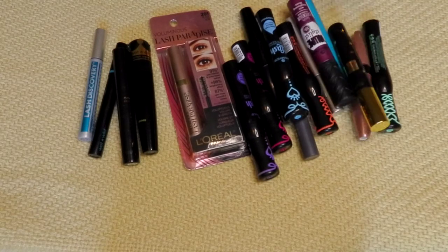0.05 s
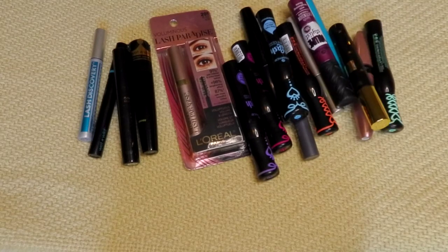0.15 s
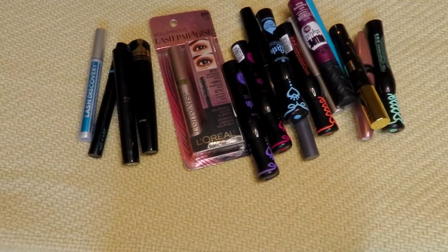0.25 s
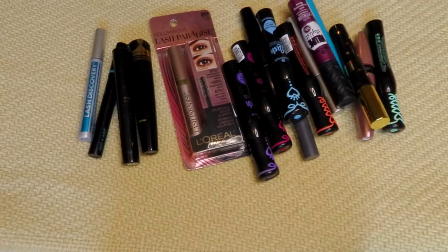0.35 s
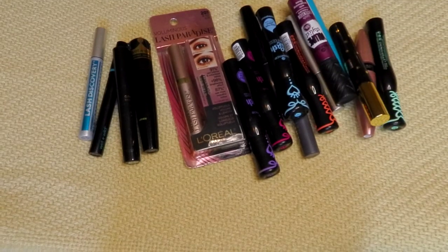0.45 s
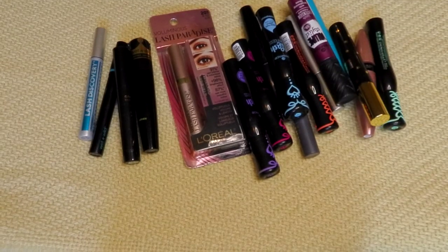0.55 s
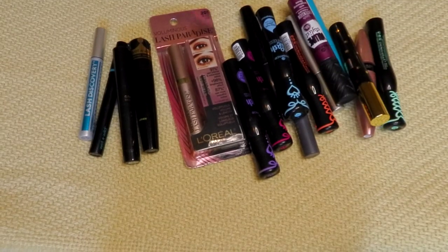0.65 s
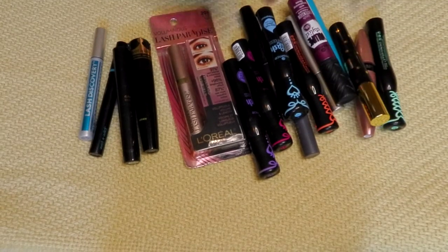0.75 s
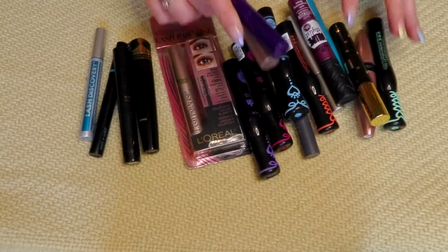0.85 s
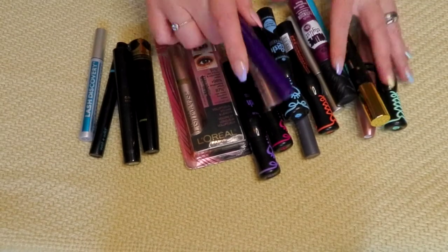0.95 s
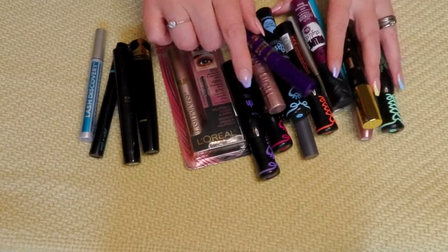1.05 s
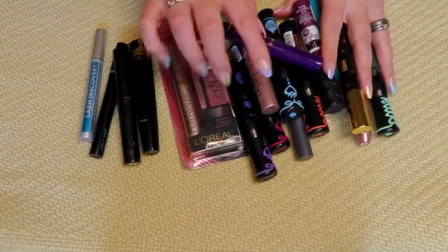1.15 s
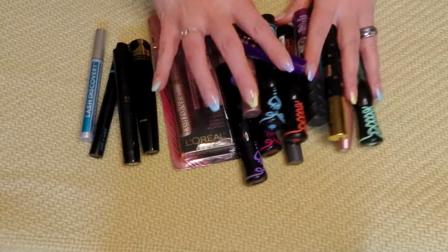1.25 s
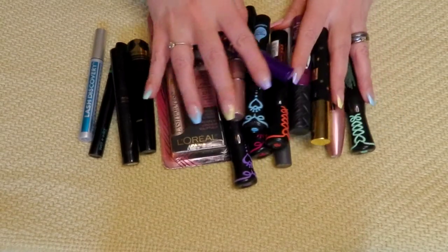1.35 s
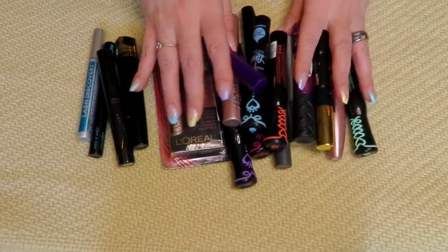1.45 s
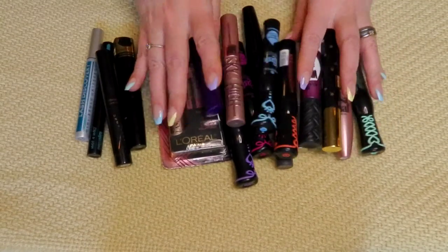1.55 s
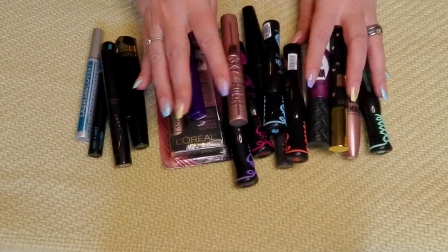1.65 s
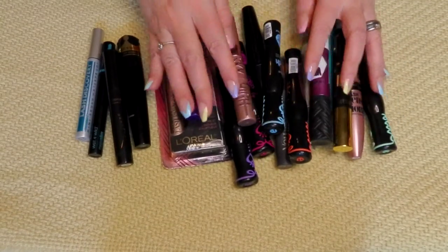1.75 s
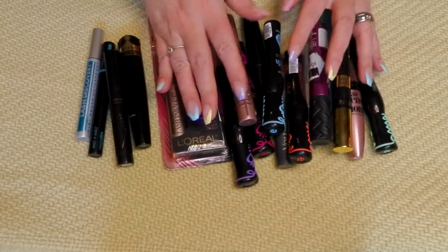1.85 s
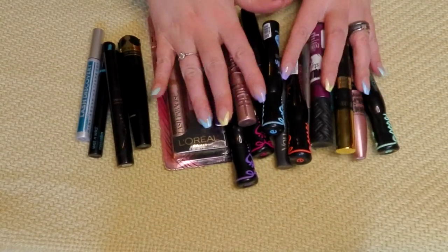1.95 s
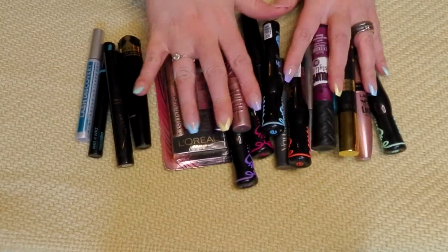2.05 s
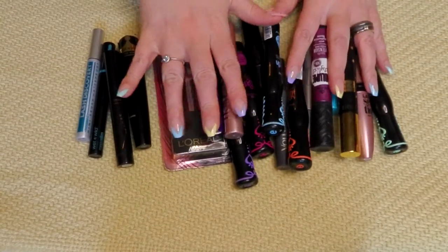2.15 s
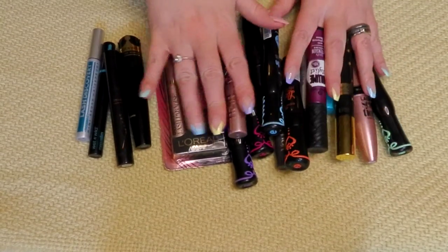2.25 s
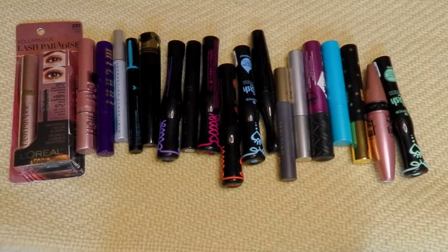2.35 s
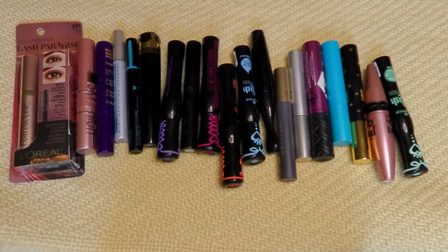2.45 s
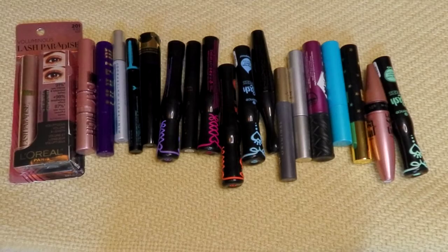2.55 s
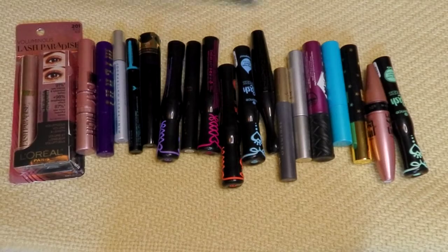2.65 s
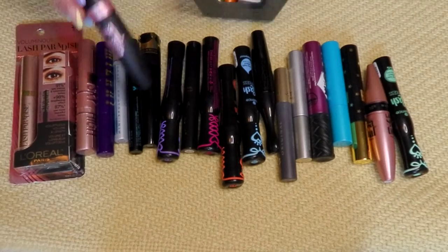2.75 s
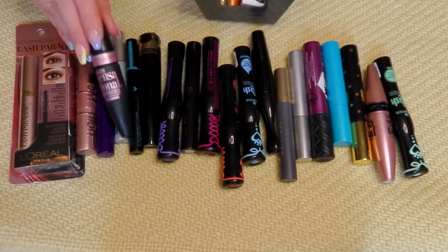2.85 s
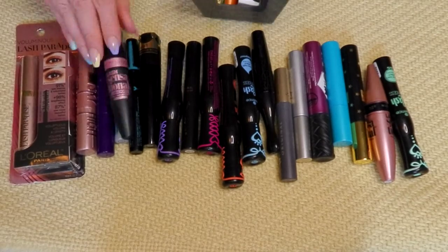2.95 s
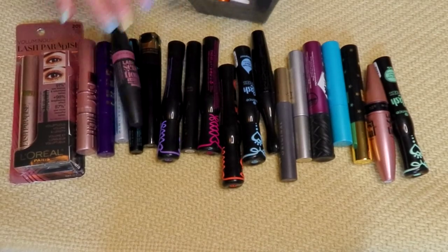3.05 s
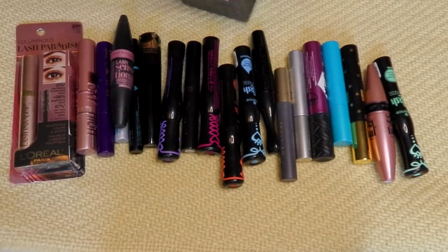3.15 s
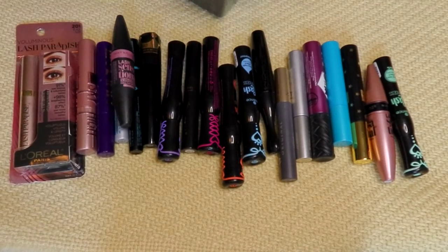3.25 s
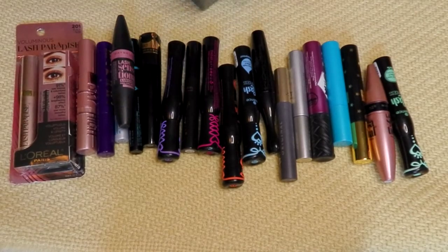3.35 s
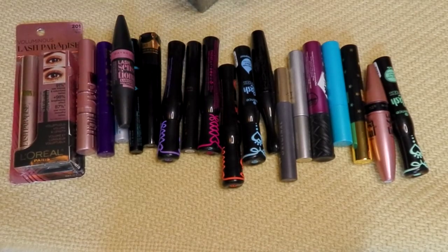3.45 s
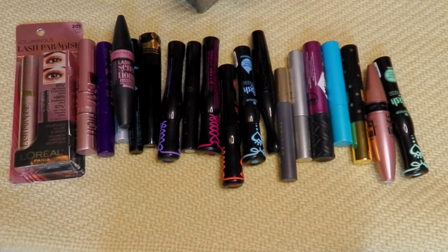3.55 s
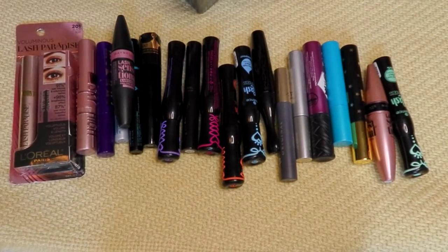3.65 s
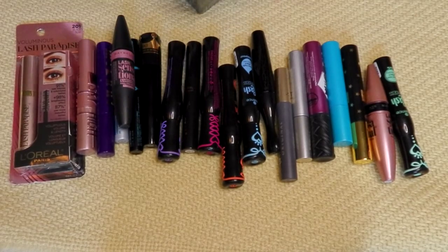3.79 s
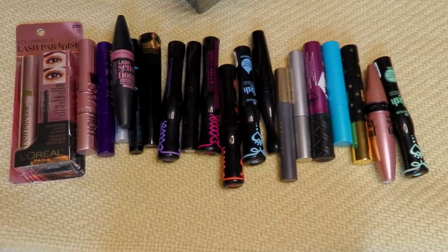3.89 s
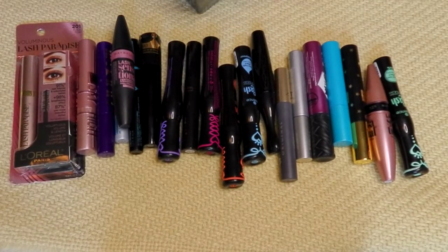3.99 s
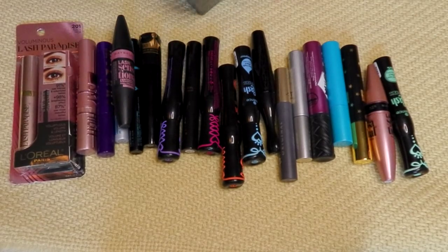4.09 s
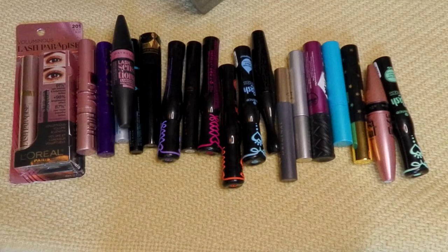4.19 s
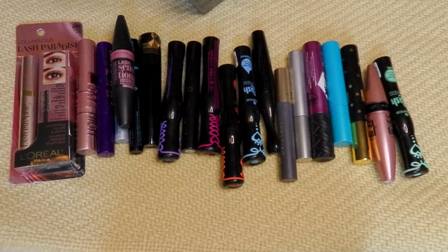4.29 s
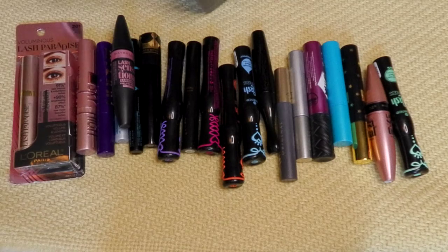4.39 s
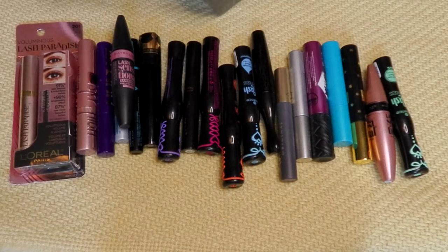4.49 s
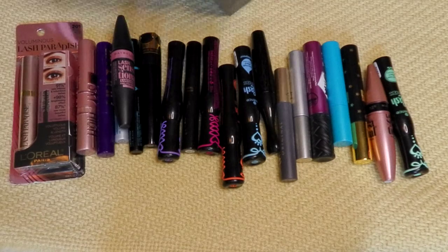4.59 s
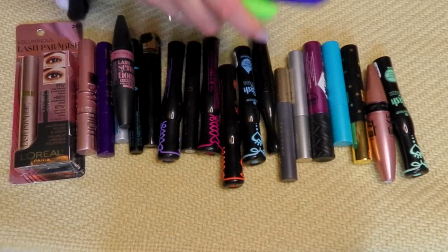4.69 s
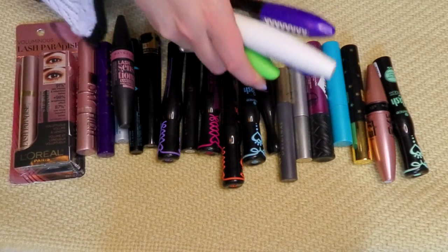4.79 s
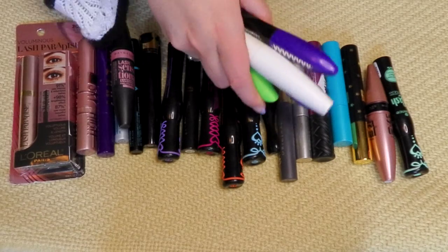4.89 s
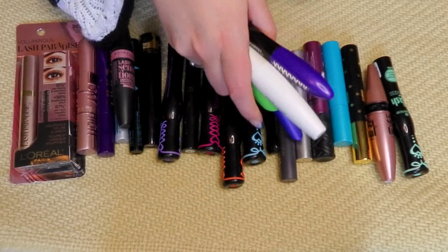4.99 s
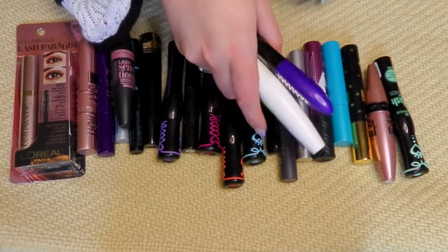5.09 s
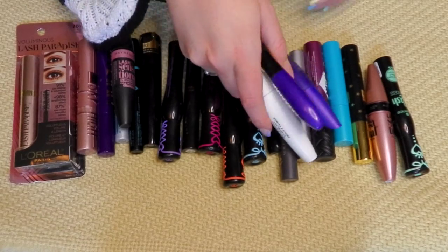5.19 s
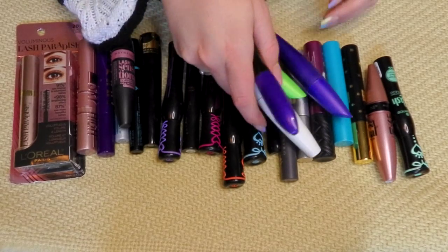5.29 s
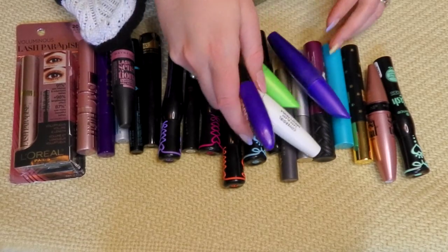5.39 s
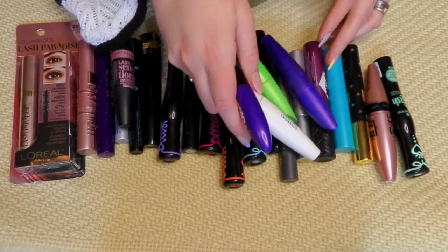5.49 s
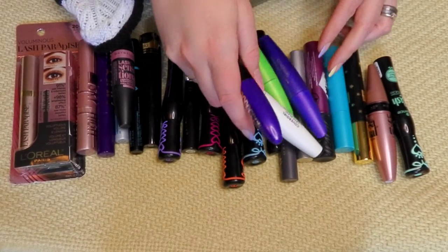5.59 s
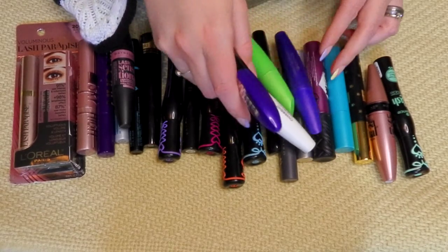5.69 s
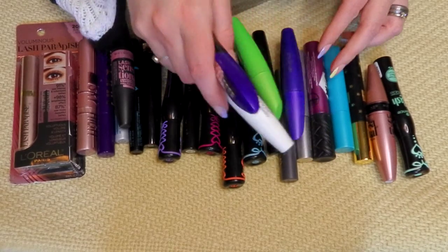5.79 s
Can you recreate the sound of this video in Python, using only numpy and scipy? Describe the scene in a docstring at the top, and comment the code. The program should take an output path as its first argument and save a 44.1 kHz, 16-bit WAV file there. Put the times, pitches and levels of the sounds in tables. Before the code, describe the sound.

Two isolated ticks, near quiet, then dense dry clatter of small hard plastic tubes on padded cloth, faint scuffing between. Next a short box rattle with a scrape, a few hollow clacks, then a longer, louder box rummage with a struck metal sleeve and high pings. Finally a handful of bright tube clicks with soft swishes. Close-miked, short echoes, steady low room noise.

```python
"""Make-up tubes on a cloth

Plastic make-up tubes are pushed into a row on a woven cloth, close by in a small, soft room.
They click together (a sharp burst plus fading tones) and thud on the cloth (low swings plus noise).
Twice a hand rummages in a box: blunter knocks make it ring, and a metal sleeve is struck.
A few short, high pings stand out, each one clear tone. Shaped noise makes the sliding and brushing;
short echoes and a steady rumble and hiss make the room.
"""
import sys
import numpy as np
from scipy import signal
from scipy.fft import rfft, irfft, next_fast_len
from scipy.io import wavfile
from scipy.ndimage import uniform_filter1d

SR = 44100
rng = np.random.default_rng(int(sys.argv[2]) if len(sys.argv) > 2 else 0)


def dump(signal):
    """Clip the signal to [-1, 1] and save it as 16-bit WAV at the path in sys.argv[1]."""
    limited = np.clip(np.atleast_2d(signal).T, -1, 1)
    pcm = np.round(limited * 32767).astype(np.int16)
    wavfile.write(sys.argv[1], SR, pcm)


N = 257103  # length in samples

# tube against tube: start_s, ring_hz, level_db, hardness_db (extra treble of the contact)
CLICKS = [(0.0375, 11940, -29, -9.5), (0.0511, 3020, -45, 1.5), (0.1103, 1550, -35, 4),
          (0.1151, 2360, -37.5, 8.5), (0.119, 517, -42.5, 0), (0.5233, 1360, -55.5, 6.5),
          (0.633, 3000, -63, 1), (1.046, 1960, -50, 1), (1.0538, 4860, -38, 5), (1.0543, 3100, -31.5, 6.5),
          (1.0637, 4700, -53, 1), (1.0747, 5220, -33, 5.5), (1.0964, 3060, -42, 13.5),
          (1.1012, 1760, -36.5, 0), (1.1085, 700, -36, 13), (1.12, 1200, -46, -2), (1.131, 900, -51, 7),
          (1.144, 1520, -47.5, 16), (1.153, 1310, -52, 10), (1.2485, 3500, -38, -3.5),
          (1.261, 1790, -39, 5.5), (1.285, 4960, -44.5, -5.5), (1.3597, 1480, -40, 12),
          (1.364, 6000, -32.5, -5.5), (1.3722, 3180, -36.5, -1.5), (1.381, 2550, -43.5, -4),
          (1.4714, 6240, -34, -10.5), (1.4785, 5900, -31, -11.5), (1.529, 2180, -48, -3),
          (1.5405, 1100, -30.5, 4), (1.5962, 2100, -45.5, 11.5), (1.656, 3030, -61, -3),
          (1.664, 1490, -31, 10), (1.674, 1500, -45, 5), (1.698, 1770, -46, 1), (1.708, 1800, -42.5, -1.5),
          (1.768, 2460, -49.5, 3), (1.804, 2700, -48.5, -0.5), (1.8428, 2100, -39.5, -5),
          (1.8523, 2560, -39, -4), (1.8577, 11100, -26.5, -15), (2.0213, 15000, -27, -16),
          (2.0378, 1800, -35.5, 4.5), (2.1548, 4900, -44, -8.5), (2.282, 3290, -45.5, 1.5),
          (2.373, 960, -50, 12), (2.3923, 7700, -31, -9), (2.4083, 1570, -44, -9),
          (2.8358, 1450, -51.5, 10.5), (2.9358, 1610, -28.5, 6), (2.94, 496, -28.5, 14.5),
          (2.963, 2170, -54, -2), (3.0921, 1590, -47.5, 18.5), (3.0939, 1630, -33, -16),
          (3.1294, 2180, -57, 2), (3.1356, 2020, -39, -2), (3.1505, 2070, -36, 7.5),
          (3.2093, 1330, -46.5, -11), (3.2395, 2230, -42, -2.5), (3.5694, 12100, -52.5, 1.5),
          (4.981, 2760, -41.5, -2.5), (5.0702, 3750, -34, 4.5), (5.0806, 3150, -44.5, 7),
          (5.1086, 2720, -43.5, 11), (5.116, 2650, -45.5, 3), (5.2153, 2860, -42, 0),
          (5.221, 2630, -43.5, 1), (5.2275, 617, -40, -4.5), (5.258, 1700, -52.5, -5),
          (5.3085, 2510, -31.5, 9.5), (5.3117, 4800, -35, -2.5), (5.4711, 1850, -43.5, 6),
          (5.6165, 3300, -36, 6.5), (5.6215, 3500, -46, -5), (5.6269, 3540, -46, 3), (5.628, 3760, -44, -6),
          (5.6389, 3320, -41, -11), (5.6478, 12500, -23, -17), (5.6722, 1550, -46.5, 9),
          (5.676, 2540, -42, -2), (5.679, 3060, -37.5, -5), (5.6875, 3670, -43, -9),
          (5.696, 3300, -42, -10), (5.709, 2800, -48, -3), (5.716, 3050, -48.5, -4),
          (5.7759, 1820, -43.5, 3), (5.782, 1850, -48, 4), (5.805, 3270, -56, -1)]
# tubes knocking in the box: start_s, ring_hz, level_db, hardness_db (extra treble of the contact)
KNOCKS = [(2.5758, 3500, -38.5, -4), (2.586, 3420, -50, -9), (2.6094, 630, -35, 3.5),
          (2.6105, 4650, -38.5, -8), (2.6334, 1500, -42, 2), (2.643, 2370, -41, 0), (2.657, 2600, -40, 3),
          (2.676, 870, -28, 4), (2.6805, 1440, -35, -4.5), (2.7326, 690, -46.5, -1),
          (2.7432, 1000, -30, 4.5), (2.7479, 1500, -39, 2), (2.768, 537, -51, -11.5),
          (3.3351, 1310, -45.5, 6), (3.3588, 1165, -44.5, 5), (3.363, 1350, -48, -13),
          (3.3975, 2210, -55, 3), (3.625, 1420, -54, 10.5), (3.6404, 1250, -40.5, 1),
          (3.6612, 13000, -28, -8.5), (3.727, 1220, -36, 1.5), (3.7355, 1740, -29, 0),
          (3.7413, 1840, -28, -3.5), (3.749, 1450, -31.5, 7), (3.752, 1720, -31, -11.5),
          (3.7587, 1370, -23.5, -2.5), (3.7635, 1340, -29, 2), (3.7829, 534, -36.5, 6),
          (3.7926, 875, -37, 7), (3.7995, 860, -48, -2), (3.8118, 970, -40, 2), (3.826, 1130, -43, 4.5),
          (3.8349, 1064, -33, 0.5), (3.839, 2820, -41, -1.5), (3.8441, 980, -47, -2),
          (4.0098, 1090, -38, 2.5), (4.0429, 800, -38, -2.5), (4.0597, 3330, -36.5, -4),
          (4.1062, 1200, -46.5, 2), (4.116, 3240, -39.5, -6.5), (4.149, 1200, -39.5, -4),
          (4.16, 2450, -38, -0.5), (4.1733, 1480, -35, 3), (4.176, 5390, -18, -4), (4.1766, 987, -22.5, 3),
          (4.184, 3500, -33.5, 12), (4.2229, 905, -20, 3.5), (4.2669, 1690, -21, -2),
          (4.2782, 2770, -32.5, 3), (4.393, 1530, -45.5, -1.5), (4.4385, 1490, -43.5, -1),
          (4.449, 2150, -43, -13.5), (4.452, 2550, -44.5, 3.5), (4.4652, 780, -36.5, 1),
          (4.494, 2850, -41, -5), (4.5425, 2480, -42, -3.5), (4.5616, 1330, -30.5, -1.5)]
# ways a tube rings: pitch_ratio (times its ring pitch), level_db, t60_s (time to fade by 60 dB)
TUBE_MODES = [(0.47, -19.5, 0.035), (1, 2, 0.011), (1.42, -27.5, 0.021), (2.15, -32, 0.0036)]
# edges of the four bands that set the tone of a blow: edge_hz
BAND_EDGES = [330, 900, 2400, 6400, 16000]
# a tube lands on the padded table: start_s, pitch_hz, level_db
THUDS = [(0.039, 122, -45.5), (0.111, 237, -37.5), (1.056, 150, -45), (1.076, 150, -42.5),
         (1.101, 159, -29.5), (1.137, 154, -38.5), (1.262, 150, -44), (1.348, 145, -41.5), (1.54, 262, -29),
         (1.663, 314, -28.5), (2.037, 113, -37), (2.371, 169, -45), (2.745, 265, -63), (2.935, 149, -36),
         (3.091, 127, -36.5), (3.333, 281, -42), (3.748, 164, -33.5), (3.783, 264, -28.5), (4, 176, -42),
         (4.179, 143, -32.5), (4.222, 263, -34), (5.073, 135, -29.5), (5.223, 298, -38), (5.31, 286, -42),
         (5.723, 187, -43), (5.781, 294, -37.5)]
# a hollow tube lands on its neighbours and rocks: start_s, level_db
HOLLOW_TAPS = [(2.963, -28), (3.0925, -29), (3.1294, -31), (3.1362, -27.5), (3.2101, -42), (3.2415, -39)]
# ways the hollow tube rings: pitch_hz, level_db, t60_s
HOLLOW_MODES = [(1160, -14, 0.041), (1840, -11, 0.02), (2113, 1.5, 0.016)]
# resonances of the box: pitch_hz, width_hz, level_db
BOX_RESONANCES = [(285, 22, 0), (519, 20, -7.5), (655, 49, 1.5), (809, 10, -6), (972, 34, 6),
                  (1527, 130, -12.5), (2290, 48, -5), (2930, 80, 2), (3430, 180, 2)]
# loose tubes jostle in the box: start_s, end_s, level_db
JOSTLES = [(2.56, 2.72, -45.5), (3.33, 3.52, -56), (3.7, 3.87, -43.5), (3.98, 4.2, -53), (4.3, 4.53, -48)]
# a tube scrapes out from between the others: start_s, end_s, level_db
RASPS = [(2.648, 2.684, -35.5)]
# resonances of that scrape: pitch_hz, width_hz, level_db
RASP_RESONANCES = [(2560, 350, -4), (3460, 300, 2), (4500, 170, 6), (9200, 1200, -24)]
# short, high pings, such as a metal cap, a plastic tube or a fingernail tick:
# start_s, pitch_hz, level_db, t60_s
PINGS = [(2.0202, 14000, -19, .005), (4.2068, 2920, -23, .05), (4.5725, 2860, -25, .047),
         (5.0705, 10000, -28, .025)]
# a metal sleeve is struck in the box: start_s, level_db
SLEEVE_HITS = [(4.0598, -33), (4.1845, -31)]
# ways the sleeve rings: pitch_hz, level_db, t60_s
SLEEVE_MODES = [(2500, -5.5, 0.1), (4430, -3, 0.059), (5240, 2.5, 0.036), (7200, -9, 0.056)]
# a tube rubs along another and sings faintly: start_s, end_s, level_db
SQUEAKS = [(2.47, 2.535, -57)]
# sliding and jostling under the hands, a level curve: time_s, level_db
SLIDING = [(0, -55), (.2, -83), (.6, -63.5), (1.03, -84.5), (1.12, -47), (1.2, -56.5), (1.6, -51.5),
           (1.93, -58), (2.24, -58), (2.45, -53), (3.2, -64), (3.56, -55), (4.5, -59), (4.7, -64),
           (5.55, -58), (5.83, -57)]
# tone colour of the sliding: frequency_hz, level_db
SLIDE_COLOUR = [(59, -44), (100, -0.5), (676, -6.5), (1830, -11.5), (2170, -12), (5900, -17), (12100, -20),
                (16000, -16)]
# a hand or a tube brushes past: start_s, end_s, level_db
SWISHES = [(.69, .8, -67), (1.96, 2.03, -57.5), (3.01, 3.08, -68), (5.0, 5.06, -56.5), (5.18, 5.31, -48.5)]
# tone colour of the room rumble and hiss: frequency_hz, level_db
FLOOR_COLOUR = [(12, -50), (20, -25), (43, 0.5), (123, -8), (150, -10), (328, -6), (459, -9.5), (825, -18),
                (1030, -20.5), (16000, -28.5)]
# where the hands work: time_s, left_minus_right_db
PLACE = [(0, -0.5), (1.1, -0.5), (1.6, 1.5), (2.1, 0), (2.65, -0.5), (2.94, 3.5), (3.15, 3.5), (3.7, 0.9),
         (4.6, 1), (5.1, 0)]
# the left microphone port hears more bass: frequency_hz, left_minus_right_db
BASS_LEAN = [(100, -0.5), (250, 2.1), (600, 0.1), (4000, 0)]
# tone colour of the microphone: frequency_hz, level_db
MICROPHONE = [(5500, 0.5), (8000, -3.5), (10300, -1.5), (13000, -2), (16000, -8.5)]

CUT_HZ = 16200  # upper limit of the sound


def clicks():
    """Tubes meet on the cloth in short, dry clicks; plastic damps its high rings more."""
    out = np.zeros(N)
    colour_db = np.array([-1.36, -0.35, 1.16, 2.56])  # one value per band
    for start_s, ring_hz, level_db, hardness_db in CLICKS:
        tilt_db = spread(ring_hz, level_db, hardness_db, fall_db=7.0, brightening=[-0.29, 0.054, 0.78, 1.0])
        damping_db = 4.5 * np.log2(ring_hz / 2000)
        blow = strike(ring_hz, ring_db=-18.0 - damping_db, chatter_db=-21.5, chatter_t60=0.021, crack_db=-5.5)
        blow = voiced(blow, colour_db + tilt_db)
        add(out, *clustered(start_s, blow, before_db=-30.0, bounce_db=-17.5))
    return out


def strike(ring_hz, ring_db, chatter_db, chatter_t60, crack_db):
    """A hard contact, the tube's fading tones, and the duller chatter of the wand and cap inside it."""
    t = np.arange(4096) / SR
    crack, chatter = rng.standard_normal((2, len(t)))
    chatter = signal.lfilter(*signal.butter(1, 4500, fs=SR), chatter)
    blow = amp(crack_db - 60 * t / 0.0032) * crack
    blow += amp(chatter_db - 60 * t / chatter_t60) * chatter
    blow[0] += 1  # the instant of contact
    for ratio, db, t60 in TUBE_MODES:
        detune = 1 + (ratio != 1) * rng.uniform(-0.091, 0.216)  # the main ring stays in tune
        hz = ring_hz * ratio * detune
        audible = hz < CUT_HZ
        blow += audible * amp(ring_db + db - 60 * t / t60) * np.cos(2 * np.pi * hz * t)
    return blow


def spread(ring_hz, level_db, hardness_db, fall_db, brightening):
    """A blow is strongest near its ring pitch and falls per octave; a hard contact favours treble."""
    edges = np.array(BAND_EDGES)
    centres = np.sqrt(edges[1:] * edges[:-1])
    octaves_away = abs(np.log2(centres / ring_hz))
    return level_db - fall_db * octaves_away + hardness_db * np.array(brightening)


def voiced(blow, band_db):
    """Filters a blow to a set strength in four bands (dB as rms over 10 ms), without sounding early."""
    size = 8192
    hz, spectrum = np.fft.rfftfreq(size, 1 / SR), rfft(blow, size)
    edges = np.array(BAND_EDGES)
    centres, gain_db = np.sqrt(edges[1:] * edges[:-1]), np.zeros(4)
    low_cut = (hz + 1) ** 2 / (hz ** 2 + 260 ** 2)
    gain = low_cut
    for _ in range(3):  # step closer to the wanted strengths
        energy = np.histogram(hz, edges, weights=abs(spectrum * gain) ** 2)[0] * 2 / size
        power = energy / (SR / 100)
        gain_db += np.asarray(band_db) - 10 * np.log10(power + 1e-20)
        gain = low_cut * amp(np.interp(np.log(hz + 1), np.log(centres), gain_db))
    # the Hilbert transform finds the phase that puts the filter's response after the blow
    log_gain = np.log(np.maximum(gain, gain.max() / 10 ** 4))
    mirrored = np.r_[log_gain, log_gain[-2:0:-1]]
    causal = np.exp(np.conj(signal.hilbert(mirrored)))
    return irfft(spectrum * causal[:len(hz)])


def clustered(start_s, blow, before_db, bounce_db, count=4):
    """A blow sits in a cluster of weaker contacts, with small bounces afterwards."""
    lead_s, train = .008, np.zeros(SR // 15)
    early = rng.uniform(.001, lead_s, count)
    late = rng.uniform(.003, .035, count)
    signs = rng.choice([-1, 1], (count, 2))
    add(train, lead_s, [1])  # the main blow
    for before, after, sign in zip(early, late, signs):
        weaker = sign[0] * amp(before_db - 12 * before / lead_s)
        bounce = sign[1] * amp(bounce_db - 60 * after / 0.1)
        add(train, lead_s - before, [weaker])
        add(train, lead_s + after, [bounce])
    return start_s - lead_s, signal.fftconvolve(blow, train)


def thuds():
    """The padded table answers with a few damped low swings and a flutter around their pitch."""
    out, t = np.zeros(N), np.arange(SR // 6) / SR
    for start_s, hz, level_db in THUDS:
        swing = np.sin(2 * np.pi * hz * t) * amp(-60 * t / .042)
        band = signal.butter(2, [0.57 * hz, 2.63 * hz], "band", fs=SR, output="sos")
        flutter = unit(signal.sosfilt(band, rng.standard_normal(len(t)))) * amp(-60 * t / 0.068)
        thud = swing + 0.67 * flutter
        strength = np.sqrt(np.sum(thud ** 2) / (SR / 100))  # as rms over 10 ms
        add(out, start_s, amp(level_db) * thud / strength)
    return amp(-0.5) * signal.lfilter(*signal.butter(2, 85, "high", fs=SR), out)


def hollow_taps():
    """A hollow tube taps its neighbours and rings with three fading tones."""
    return rung(HOLLOW_TAPS, HOLLOW_MODES)


def box():
    """Knocks and jostling tubes shake the box, which rings along; a scrape is heard on top."""
    inside = knocks() + jostling()
    return inside + amp(-5.0) * resonant(inside, BOX_RESONANCES) + rasp()


def knocks():
    """Each blow builds up between the walls and shakes the neighbours: blunter, with a longer rattle."""
    out = np.zeros(N)
    colour_db = np.array([-1.0, -1.5, -1.5, -1.0])  # one value per band
    for start_s, ring_hz, level_db, hardness_db in KNOCKS:
        tilt_db = spread(ring_hz, level_db, hardness_db, fall_db=5.5, brightening=[-0.7, -0.08, 0.95, 1])
        blow = strike(ring_hz, ring_db=-9.0, chatter_db=-2.5, chatter_t60=0.023, crack_db=-3.0)
        build_up = 1 - np.exp(-np.arange(len(blow)) / SR / 0.00054)
        blow = voiced(blow * build_up, colour_db + tilt_db)
        add(out, *clustered(start_s, blow, before_db=-16, bounce_db=-16))
    return out


def jostling():
    """Loose tubes touch in many tiny random contacts, swelling and fading with each movement."""
    contacts = slips(per_s=330, spread_db=6.0)
    colour = [(150, -7.0), (500, -8), (1400, -9.0), (4000, -15.0), (8000, -19), (16000, -15.0)]
    return strokes(JOSTLES) * unit(coloured(contacts, colour))


def rasp():
    """Plastic sticks and slips on plastic: quick, uneven jerks excite the scrape's resonances."""
    grip = (rng.random(N) < 1500 / SR) * rng.standard_normal(N)  # about 1500 jerks per second
    return strokes(RASPS) * unit(resonant(grip, RASP_RESONANCES))


def pings():
    """Short, high pings: each is one clear fading tone, with a weak overtone if it fits below the limit."""
    out, t = np.zeros(N), np.arange(SR // 4) / SR
    for start_s, hz, level_db, t60 in PINGS:
        overtone_hz = hz * 2.08
        tone = np.sin(2 * np.pi * hz * t)
        tone += (overtone_hz < CUT_HZ) * amp(-15.5) * np.sin(2 * np.pi * overtone_hz * t)
        onset = 1 - np.exp(-t / 0.00016)
        add(out, start_s, amp(level_db - 60 * t / t60) * onset * tone)
    return out


def sleeve_hits():
    """A struck metal sleeve rings with four fading tones."""
    return rung(SLEEVE_HITS, SLEEVE_MODES)


def squeak():
    """Rubbing plastic sings with one thin tone whose pitch wavers at random."""
    waver = unit(uniform_filter1d(rng.standard_normal(N), size=200))
    pitch_hz = 4460 * (1 + 0.009 * waver)
    return strokes(SQUEAKS) * np.sin(2 * np.pi * np.cumsum(pitch_hz) / SR)


def sliding():
    """Plastic scuffs over cloth and plastic in tiny slips; skin brushing the weave is a brighter hiss."""
    level = amp(np.interp(np.arange(N) / SR, *np.transpose(SLIDING)))
    grain = coloured(slips(per_s=130, spread_db=6.0), [(300, -1.0), (3000, -2.5), (12000, -4.0)])
    scuff = unit(grain) + amp(-1.0) * rng.standard_normal(N)
    scuff = unit(coloured(scuff, SLIDE_COLOUR))
    weave = rng.standard_normal(N) * (0.5 + 0.44 * slips(per_s=580, spread_db=4))
    weave_colour = [(300, -14), (2000, 3), (5000, 3.5), (8000, 0), (11000, 3.0), (16000, 1.0)]
    swish = unit(coloured(weave, weave_colour))
    return level * amp(-1.0) * scuff + strokes(SWISHES) * swish


def room(x, early_db, tail_db, count=4):
    """The contacts move from spot to spot, so the pattern of echoes keeps changing."""
    spots_per_s = 23
    spot, wet = np.arange(N) / SR * spots_per_s, np.zeros((2, N))
    for k in range(count):
        # fades each echo pattern in and out in turn
        share = np.sin(np.pi / 2 * np.minimum((spot - k) % count, 2))
        wet += signal.oaconvolve((x * share)[None], echoes(early_db, tail_db), axes=1)[:, :N]
    return coloured(wet, [(100, 2.0), (1000, 4.0), (5000, 0.9), (12000, 0.5)])


def echoes(early_db, tail_db):
    """Scatter off the table and things nearby, then a short tail that loses its treble first."""
    t = np.arange(SR // 2) / SR
    taps = rng.choice([-1., 1.], (3, len(t))) * (rng.random((3, len(t))) < 4000 / SR)
    taps = taps[:2] + 0.77 * taps[2]  # left and right share some echoes
    early = taps * amp(-60 * t / 0.027) * (t > .0008)
    hz, when, spectrum = signal.stft(taps * (t > .007), SR, nperseg=256)
    t60 = np.interp(hz, [300, 1200, 4000, 12000], [0.26, 0.16, 0.15, 0.12])
    fading = spectrum * amp(-60 * when / t60[:, None])
    tail = signal.istft(fading, SR, nperseg=256)[1][:, :len(t)]
    early = amp(early_db) * early / np.linalg.norm(early[0])
    return early + amp(tail_db) * tail / np.linalg.norm(tail[0])


def floor():
    """Steady room rumble and microphone hiss: shaped noise, partly shared by left and right."""
    noise = rng.standard_normal((3, N))
    rumble = unit(coloured(noise[:2] + 0.34 * noise[2], FLOOR_COLOUR))
    return amp(-62.5) * rumble * amp([[.7], [-.7]])  # left slightly louder, in dB


def slips(per_s, spread_db, count=12):
    """Tiny random contacts, shared among a dozen tubes of different pitch."""
    out = np.zeros(N)
    for hz in np.geomspace(700, 5000, count):
        strength = amp(spread_db * np.minimum(rng.exponential(1, N), 3))
        train = (rng.random(N) < per_s / count / SR) * strength
        blow = strike(hz, ring_db=-13.5, chatter_db=-5.5, chatter_t60=0.043, crack_db=-3.5)
        out += signal.oaconvolve(train, blow)[:N]
    return unit(out)


def rung(hits, modes):
    """One object struck several times; each blow lands elsewhere and weighs the tones differently."""
    out, t = np.zeros(N), np.arange(SR // 5) / SR
    onset = 1 - np.exp(-t / 0.00021)
    for start_s, hit_db in hits:
        for hz, db, t60 in modes:
            tone = np.sin(2 * np.pi * hz * t) * onset
            level_db = hit_db + db + rng.uniform(-1.7, 1.2)
            add(out, start_s, amp(level_db - 60 * t / t60) * tone)
    return out


def resonant(x, resonances):
    """What x makes a body ring with: a wider resonance dies away faster."""
    t = np.arange(SR // 5) / SR
    ring = np.zeros(len(t))
    for hz, width_hz, db in resonances:
        decay = np.exp(-np.pi * width_hz * t)
        ring += amp(db) * width_hz / SR * decay * np.cos(2 * np.pi * hz * t)
    return signal.oaconvolve(x, 2 * np.pi * ring)[:N]


def strokes(rows):
    """Level of movements that swell and fade, each between its start and end."""
    level = np.zeros(N)
    for start_s, end_s, db in rows:
        length = max(round((end_s - start_s) * SR), 2)
        add(level, start_s, amp(db) * signal.windows.tukey(length, .7))
    return level


def coloured(x, points):
    """Gives x a smooth tone colour, set as dB at a few frequencies."""
    hz, db = np.transpose(points)
    size = next_fast_len(N)
    log_hz = np.log(np.fft.rfftfreq(size, 1 / SR) + 1)
    gain = amp(np.interp(log_hz, np.log(hz), db))
    return irfft(rfft(x, size) * gain, size)[..., :N]


def add(mix, start_s, sound):
    """Mixes a sound in at its start time."""
    part = mix[max(0, round(start_s * SR)):][:len(sound)]
    part += sound[:len(part)]


def unit(x):
    """Scales to rms 1."""
    return x / np.sqrt(np.mean(x ** 2) + 1e-20)


def amp(db):
    """Decibels to gain."""
    return 10 ** (np.asarray(db) / 20)


def scene():
    """The cloth lies right under the microphone; the box stands a little farther off."""
    near = clicks() + hollow_taps() + thuds() + sliding()
    far = box() + pings() + sleeve_hits() + squeak()
    near_echoes = room(near, early_db=-10.0, tail_db=-13.5)
    far_echoes = room(far, early_db=-8, tail_db=-13.5)
    mix = near + near_echoes + far + far_echoes
    # the two microphone ports hear the shortest waves differently
    port_gap = 0.32 * np.gradient(near + far)
    left = coloured(mix[0] + port_gap, [(hz, db / 2) for hz, db in BASS_LEAN])
    right = coloured(mix[1] - port_gap, [(hz, -db / 2) for hz, db in BASS_LEAN])
    side_db = np.interp(np.arange(N) / SR, *np.transpose(PLACE))
    return np.array([left, right]) * amp(np.array([side_db, -side_db]) / 2) + floor()


def record(dry):
    """The microphone colours the treble and the sharpest peaks are rounded off; then the band limit."""
    ceiling = .48
    rounded = ceiling * np.tanh(coloured(dry, MICROPHONE) / ceiling)
    band_limit = signal.firwin(401, CUT_HZ, window=("kaiser", 8), fs=SR)
    return signal.oaconvolve(rounded, band_limit[None], "same")


dry = scene()
out = record(dry)
dump(out)
```